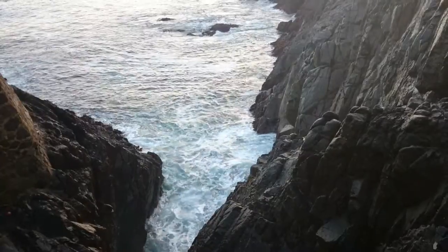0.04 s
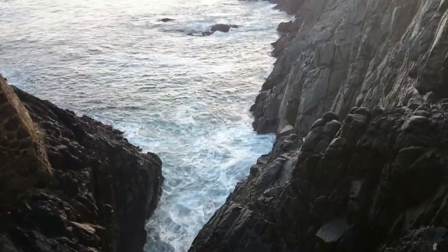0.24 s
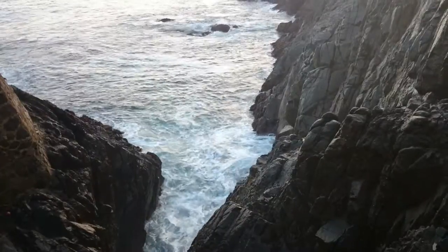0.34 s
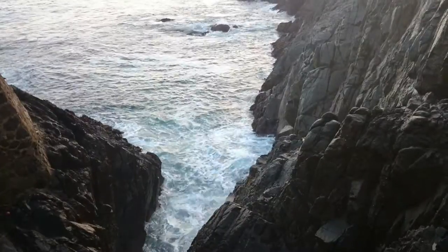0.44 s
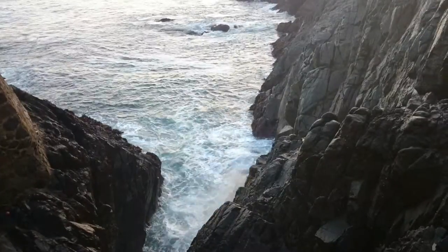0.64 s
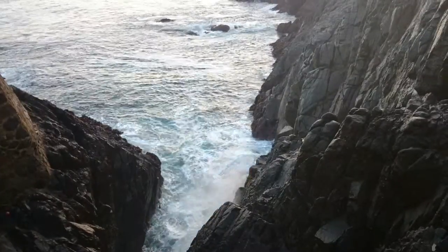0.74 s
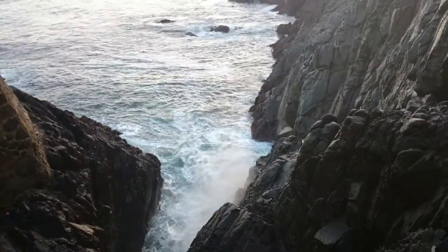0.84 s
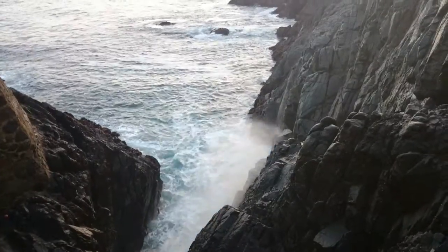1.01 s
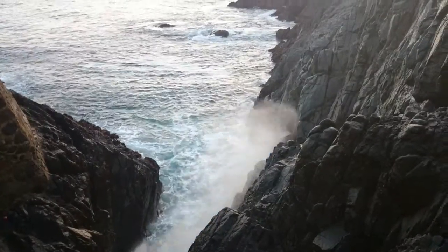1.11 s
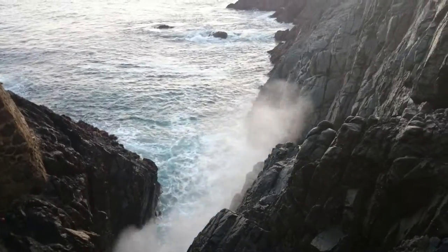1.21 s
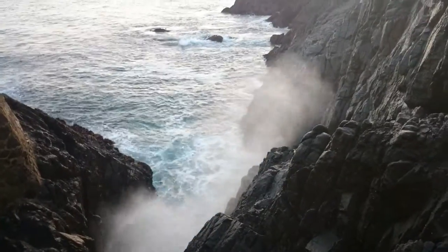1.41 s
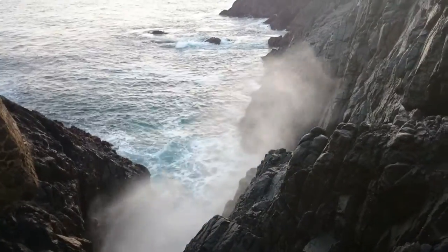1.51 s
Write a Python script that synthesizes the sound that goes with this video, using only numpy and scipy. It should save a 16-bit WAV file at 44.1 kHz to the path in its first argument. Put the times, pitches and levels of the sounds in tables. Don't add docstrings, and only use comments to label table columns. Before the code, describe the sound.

A wave surges into a narrow rock cleft over a constant wash of surf. From about 0.2 s a low roar and hiss rise, with soft thumps of trapped air. From 0.5 to 1.1 s it is loudest: deep booming, tearing white water and spray, the heaviest thump near 1.0 s. Droplets patter around 0.9 and 1.2 s; the rumble drains by 1.5 s, leaving surf and fading hiss.

```python
import sys
import numpy as np
from scipy import signal
from scipy.fft import rfft, irfft, next_fast_len
from scipy.io import wavfile

SR = 44100
rng = np.random.default_rng(int(sys.argv[2]) if len(sys.argv) > 2 else 0)


def voltage_ratio(level):
    return 10 ** (np.asarray(level, float) / 20)


def dump_mix(stems):
    frames = np.atleast_2d(stems).T
    limited = np.clip(frames, -1, 1)
    pcm = np.round(limited * 32767).astype(np.int16)
    wavfile.write(sys.argv[1], SR, pcm)


N = 68355
SIZE = next_fast_len(N + 4096)
HZ = np.maximum(np.arange(SIZE // 2 + 1) * SR / SIZE, 1)


def rms_one(x):
    return x / np.sqrt(np.mean(x ** 2) + 1e-20)


def in_time(rows):
    return np.interp(np.arange(N) / SR, *np.transpose(rows))


def at_hz(points):
    hz, value = np.transpose(points)
    return np.interp(np.log(HZ), np.log(hz), value)


def drift(rate_hz):
    hop = 40
    pole = np.exp(-2 * np.pi * rate_hz * hop / SR)
    noise = rng.standard_normal(N // hop + 2002)
    slow = signal.lfilter([1], [1, -2 * pole, pole * pole], noise)[2000:]
    return np.interp(np.arange(N) / hop, np.arange(len(slow)), rms_one(slow))


def wash(spectrum, patchy_db):
    # f/Hz, likeness/0-1
    likeness = [(60, .98), (250, .96), (500, .88), (800, .76), (1200, .55), (2600, .25), (5500, .3),
                (8000, .04)]
    alike = np.clip(at_hz(likeness), 0, 1)
    shared, apart = rfft(rng.standard_normal((2, SIZE))) * voltage_ratio(at_hz(spectrum))
    side = np.sqrt(1 - alike) * apart
    pair = np.sqrt(1 + alike) * shared + side * [[1], [-1]]
    return rms_one(irfft(pair, SIZE)[:, :N]) * voltage_ratio(patchy_db * drift(7.3))


def follow(curve_db, peak_db, slope):
    return voltage_ratio(peak_db + slope * (curve_db - curve_db.max()))


def surf():
    # f/Hz, density/(dB per Hz)
    surf_spectrum = [(30, -39), (60, -1), (150, -8.5), (600, -2), (1000, -6.5), (2500, -8.5), (7000, -12),
                     (16000, -11)]
    return voltage_ratio(-41.5) * wash(surf_spectrum, patchy_db=0.67)


def mist():
    # f/Hz, density/(dB per Hz)
    mist_spectrum = [(4000, -13), (8000, -3), (11000, 1), (16000, 1)]
    # t/s, level/dB, length/s
    gusts = [
        (.93, -41, 0.087),
        (1.21, -41, 0.093),
    ]
    t = np.arange(N) / SR
    gain = sum(voltage_ratio(db) * np.exp(-.5 * ((t - t_s) / length_s) ** 2) for t_s, db, length_s in gusts)
    return gain * wash(mist_spectrum, patchy_db=0.3)


def spray():
    # t/s, level/dB
    plume_curve = [(0, -46.5), (.2, -40.5), (.39, -38), (.556, -36), (.75, -35.5), (.95, -35), (1.1, -39),
                   (1.35, -40), (1.55, -41)]
    # f/Hz, density/(dB per Hz)
    spray_spectrum = [(700, -15), (1300, -6.5), (2000, -3.5), (4000, -2.5), (7000, -5), (10000, -8),
                      (16000, -10)]
    gain = follow(in_time(plume_curve), peak_db=-38, slope=1.7)
    return gain * wash(spray_spectrum, patchy_db=-0.25)


def churn():
    # t/s, level/dB
    churn_curve = [(0, -58), (.2, -51.5), (.35, -44), (.5, -40), (.65, -39.5), (.82, -39), (.95, -41),
                   (1.1, -46), (1.3, -53), (1.55, -60)]
    # f/Hz, density/(dB per Hz)
    foam_spectrum = [(250, -11.5), (500, 0.5), (800, -1.5), (1100, -9.5), (1900, -6.5), (3000, -18.5),
                     (5000, -20)]
    return voltage_ratio(in_time(churn_curve)) * wash(foam_spectrum, patchy_db=0.6)


def roar(surge_db):
    # f/Hz, density/(dB per Hz)
    roar_spectrum = [(45, -30), (130, 3), (200, -3), (300, -3), (390, -6), (500, -12.5), (1000, -22),
                     (3000, -41)]
    gain = follow(surge_db, peak_db=surge_db.max() + 0.13, slope=1.213)
    return gain * wash(roar_spectrum, patchy_db=0.64)


def boom(surge_db):
    # f/Hz, density/(dB per Hz)
    boom_spectrum = [(25, -25), (45, -5), (56, -3), (80, 0.5), (120, -6), (150, -2.5), (200, -24),
                     (300, -31.5)]
    gain = follow(surge_db, peak_db=surge_db.max() - 6.5, slope=0.89)
    return gain * wash(boom_spectrum, patchy_db=-0.8)


def thumps():
    # t/s, peak level/dB, f/Hz, length/s
    pockets = [(0.147, -38.5, 96, 0.02), (0.23, -32.5, 80, 0.021), (.283, -43, 151, 0.013),
               (.34, -33.5, 115, 0.01), (0.419, -34, 92.2, 0.016), (0.502, -31.5, 90, 0.019),
               (.533, -37, 150, 0.0069), (.597, -27.5, 114, 0.018), (0.612, -25.5, 68, 0.036),
               (0.66, -25.5, 101, 0.012), (.706, -26.5, 83.3, 0.026), (.752, -25, 65, .018),
               (0.788, -23, 94.5, 0.025), (0.794, -29, 128.4, 0.018), (0.863, -31, 71, .02),
               (0.916, -23, 86, .02), (.984, -17.5, 80, .018), (1.037, -29, 61.5, 0.035),
               (1.046, -24, 111, 0.024), (1.112, -28, 62, 0.014), (1.132, -30, 100, 0.012),
               (1.158, -32, 139, .022), (1.207, -32.5, 93, .02), (1.274, -36.5, 119, 0.02),
               (0.373, -39, 65, 0.024), (0.548, -32, 68, 0.022), (0.901, -28, 58, .02),
               (1.251, -36, 62, 0.014), (1.452, -54, 63, .06)]
    t_s, db, hz, length_s = np.transpose(pockets)[:, :, None]
    phase = rng.random((len(pockets), 1)) * 2 * np.pi
    t = np.arange(N) / SR - t_s
    swell = voltage_ratio(db) * np.exp(-.5 * (t / length_s) ** 2)
    pulse = np.sin(2 * np.pi * hz * t * (1 - .4 * t) + phase)
    return np.sum(swell * pulse, axis=0)


def scene():
    # t/s, level/dB
    surge_curve = [(0, -46.5), (.09, -48.5), (.22, -39.5), (.38, -36), (.5, -31.5), (.62, -31.5), (.8, -30),
                   (.98, -30), (1.07, -32.5), (1.16, -34), (1.27, -39.5), (1.36, -43), (1.55, -55.5)]
    surge_db = in_time(surge_curve)
    background = surf() + mist() + spray()
    return background + churn() + roar(surge_db) + boom(surge_db) + thumps()


def port(colour, peaks):
    db = at_hz(colour)
    for hz, width_hz, top_db in peaks:
        db = db + top_db / (1 + (2 * (HZ - hz) / width_hz) ** 2)
    return voltage_ratio(db)


def top_cut(x):
    return signal.sosfilt(signal.butter(12, 17070, fs=SR, output="sos"), x)


def record(dry):
    # f/Hz, gain/dB
    left_colour = [(60, -2.5), (300, 0.4), (1000, 0), (3000, 0.6), (8000, 0.5), (10000, -4), (13000, -4),
                   (15800, -25)]
    right_colour = [(60, 4), (300, 2.35), (1000, 5), (3000, 3.4), (8000, -1.5), (10000, -10.5), (13000, -5),
                    (15800, 0.5)]
    # f/Hz, width/Hz, gain/dB
    left_peaks = [(5300, 2000, 6.5), (11390, 990, 8)]
    right_peaks = [(5465, 950, 12), (6290, 1400, 7.5)]
    # f/Hz, phase/rad
    left_lead = [(60, .6), (170, .5), (400, .2), (700, -.05), (1200, .6), (2000, .7), (3500, 2.5),
                 (6000, 3)]
    top_cut_hz, dc_offset = 15740, -.0011
    half_lead = np.exp(.5j * at_hz(left_lead))
    left = port(left_colour, left_peaks) * half_lead
    right = port(right_colour, right_peaks) / half_lead
    response = np.array([left, right]) * (HZ < top_cut_hz)
    heard = irfft(rfft(dry, SIZE) * response, SIZE)[:, :N] + dc_offset
    return top_cut(heard)


dry = scene()
out = record(dry)
dump_mix(out)
```